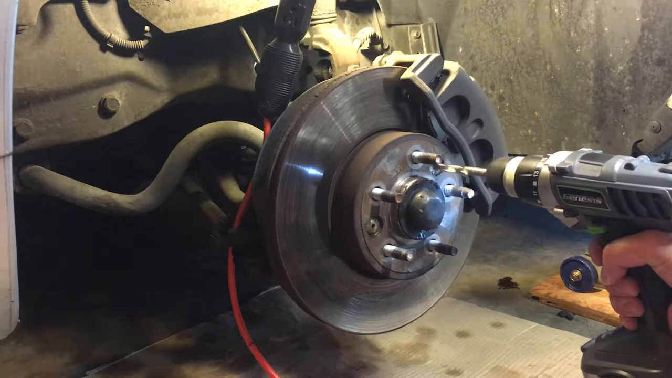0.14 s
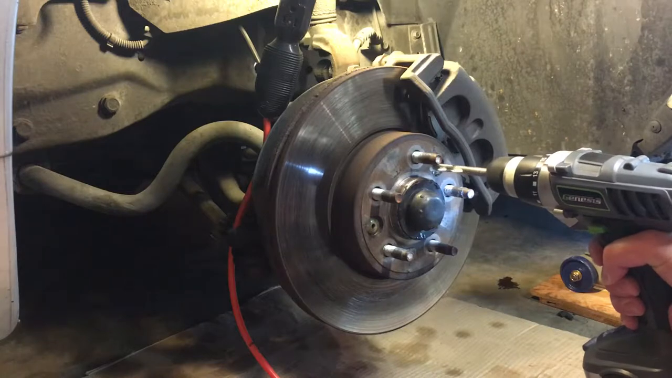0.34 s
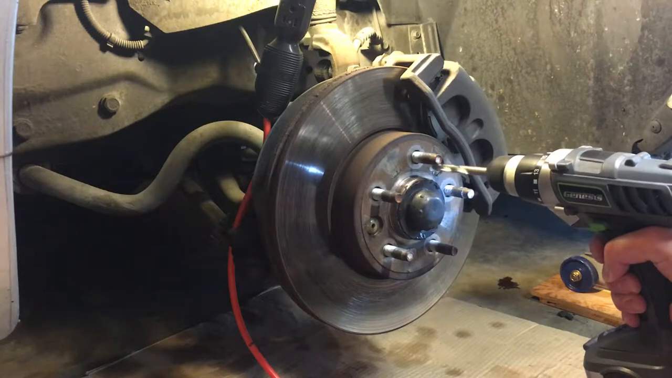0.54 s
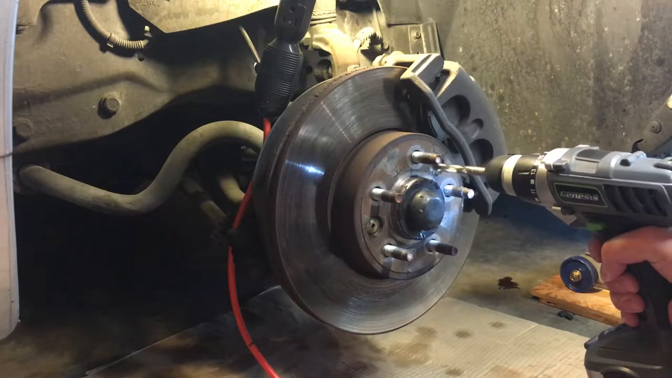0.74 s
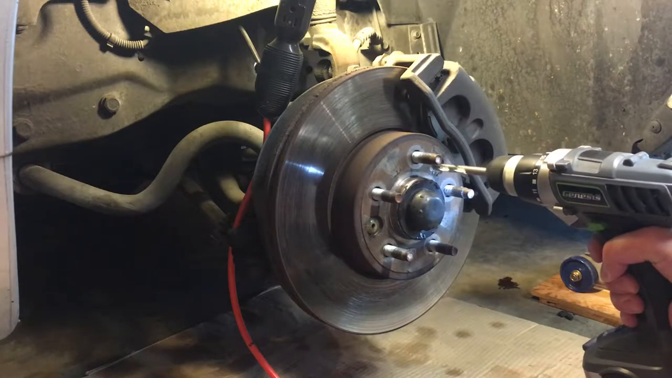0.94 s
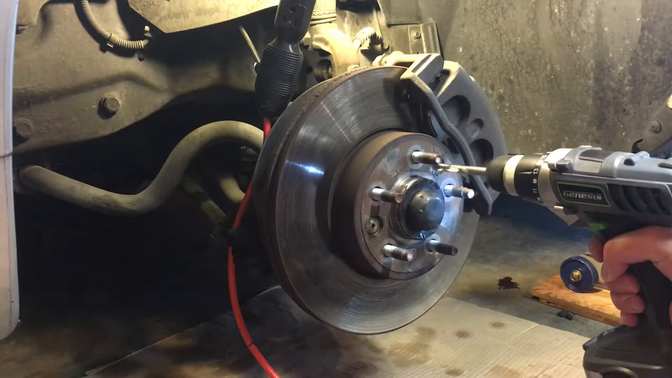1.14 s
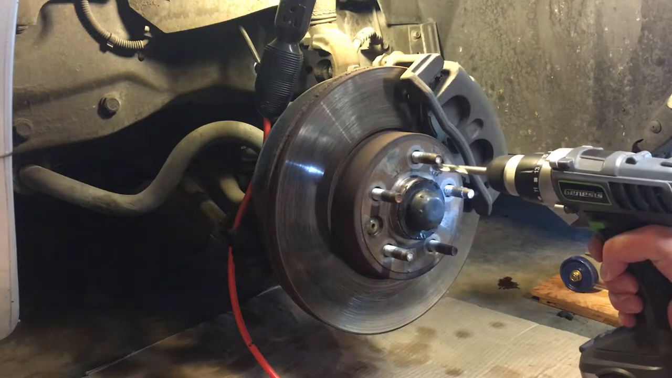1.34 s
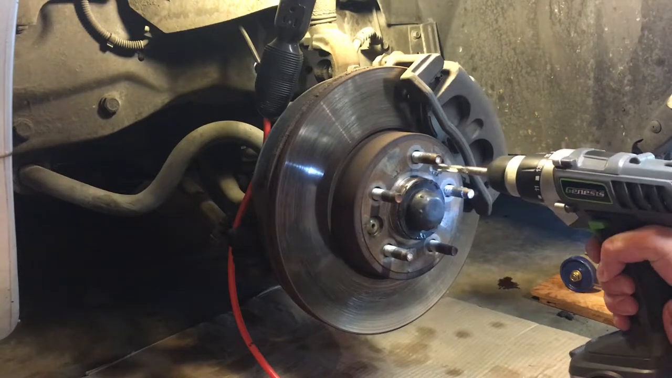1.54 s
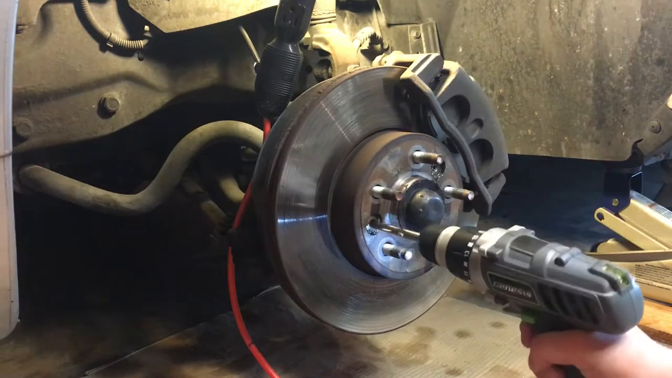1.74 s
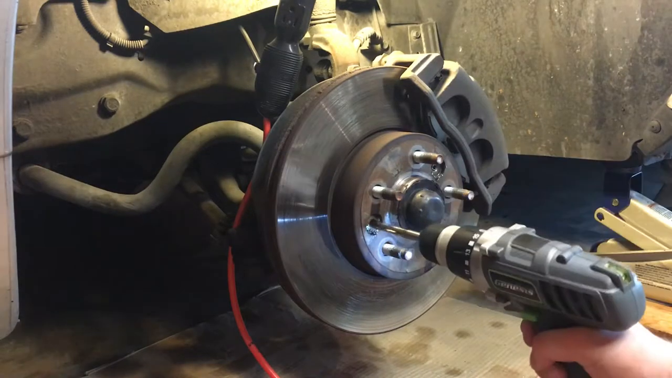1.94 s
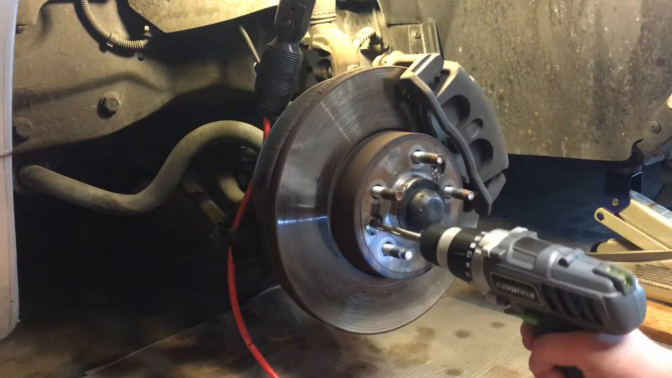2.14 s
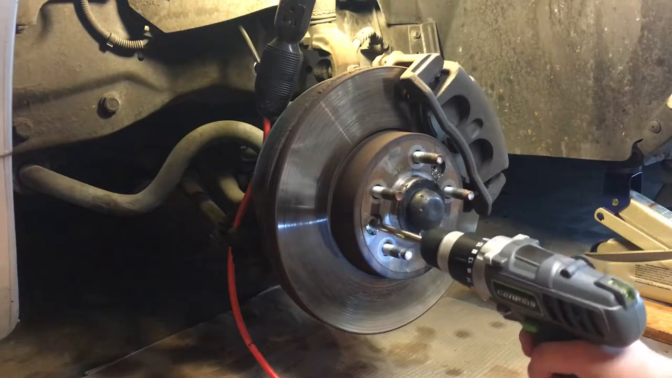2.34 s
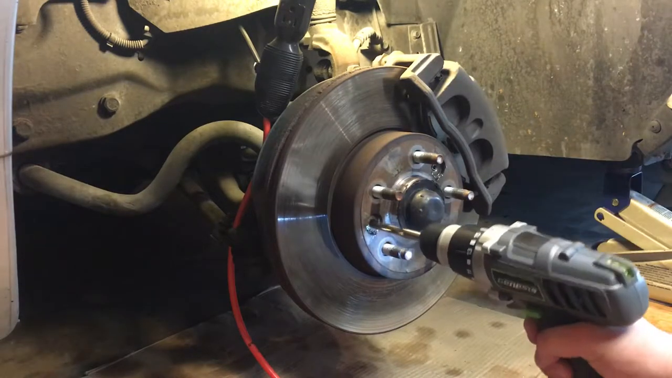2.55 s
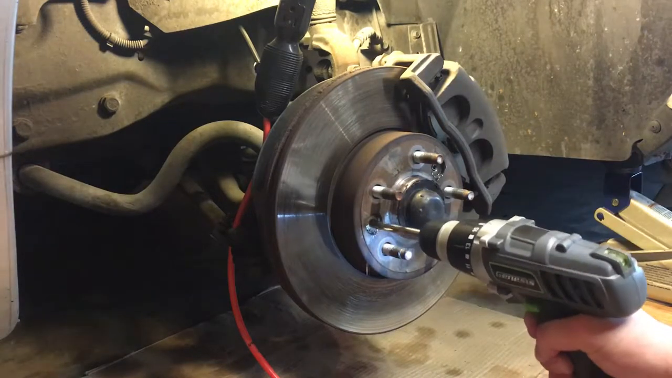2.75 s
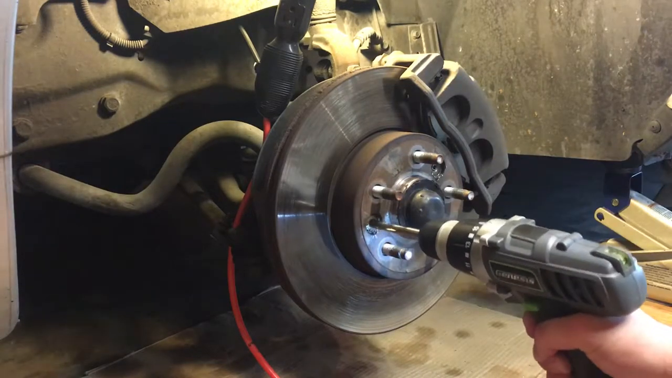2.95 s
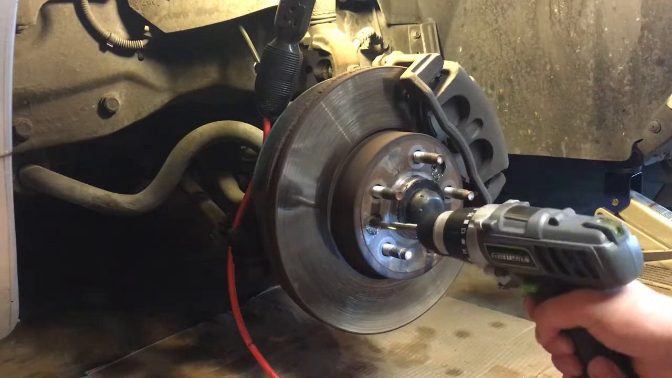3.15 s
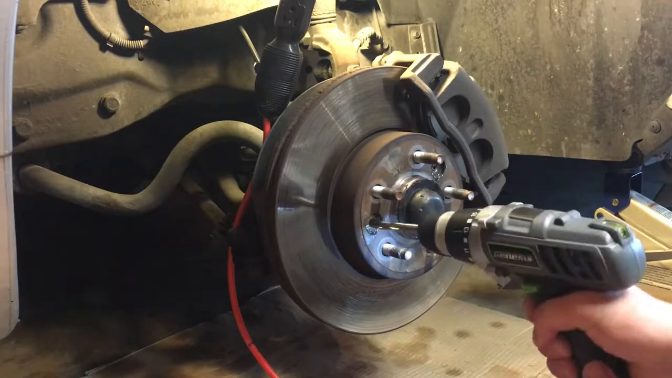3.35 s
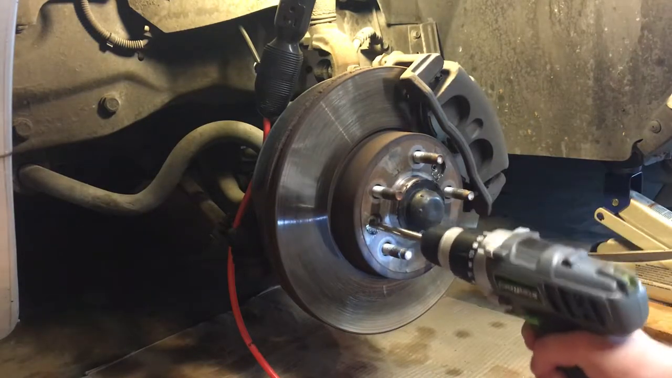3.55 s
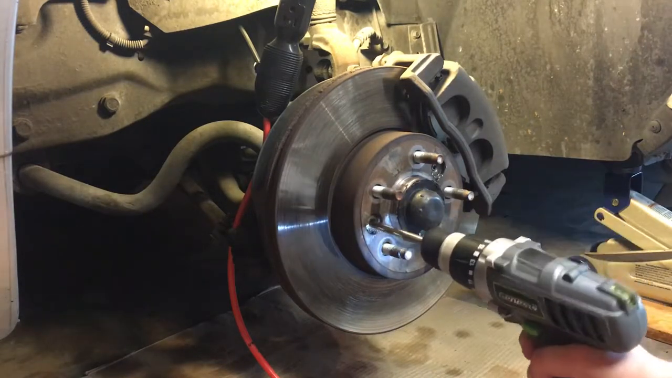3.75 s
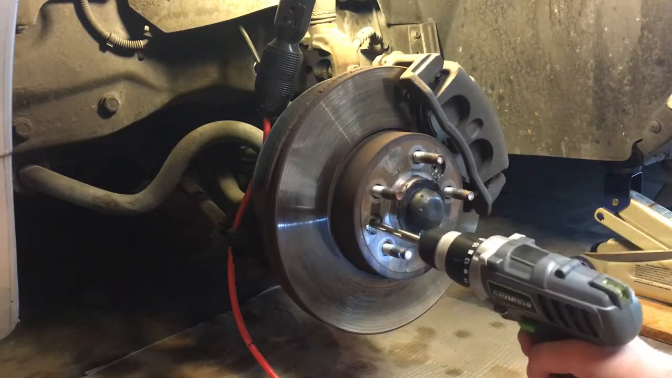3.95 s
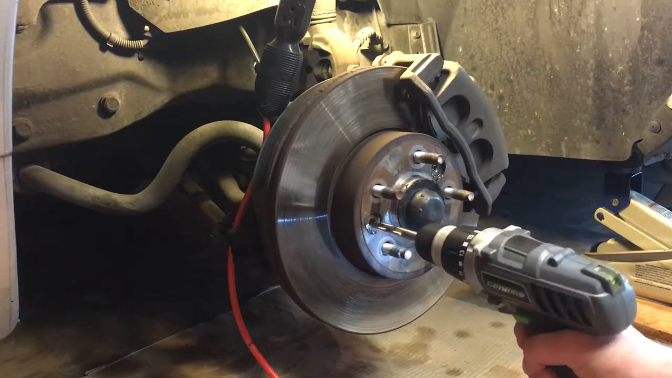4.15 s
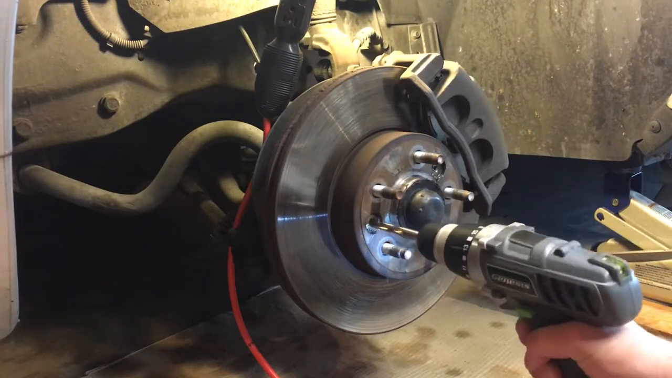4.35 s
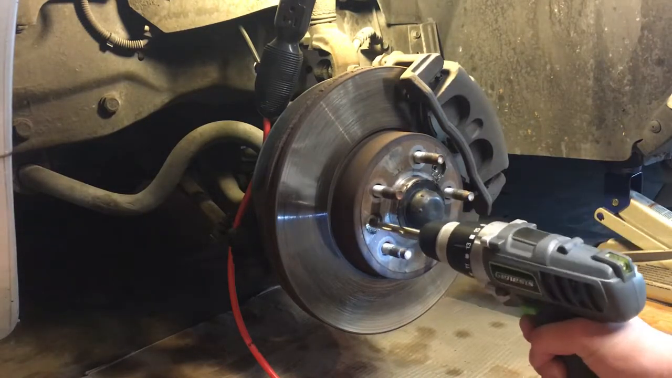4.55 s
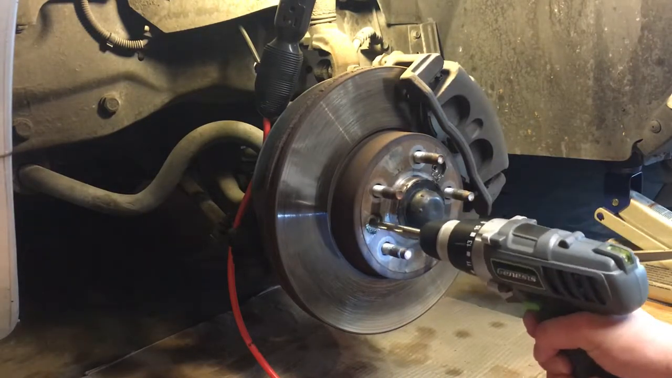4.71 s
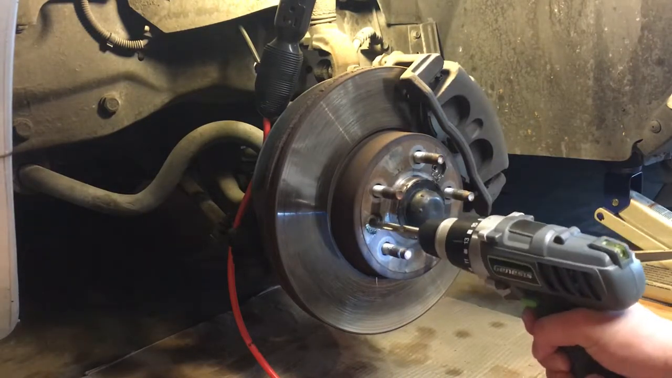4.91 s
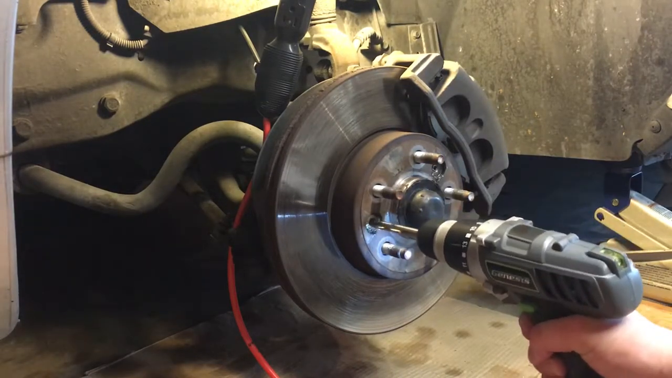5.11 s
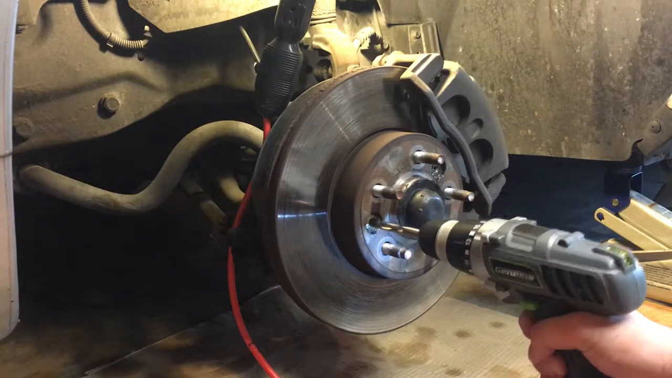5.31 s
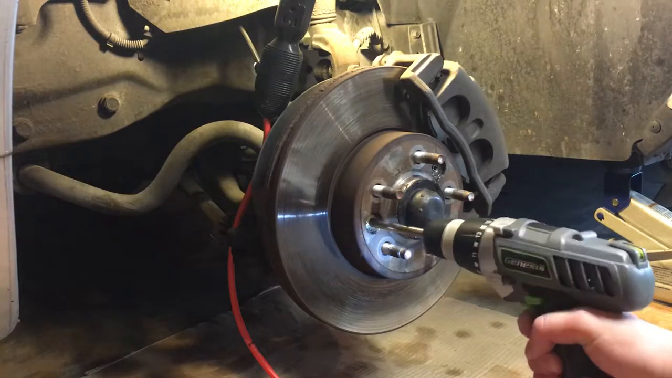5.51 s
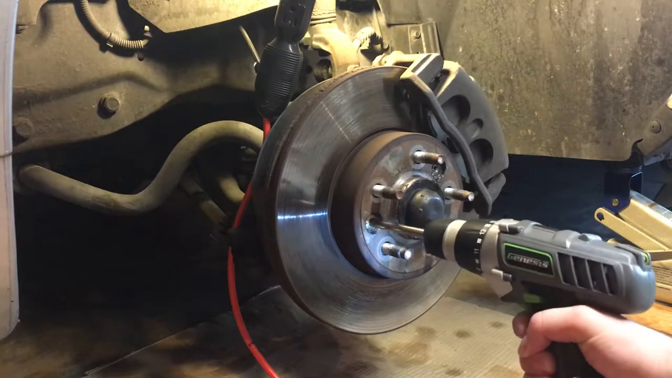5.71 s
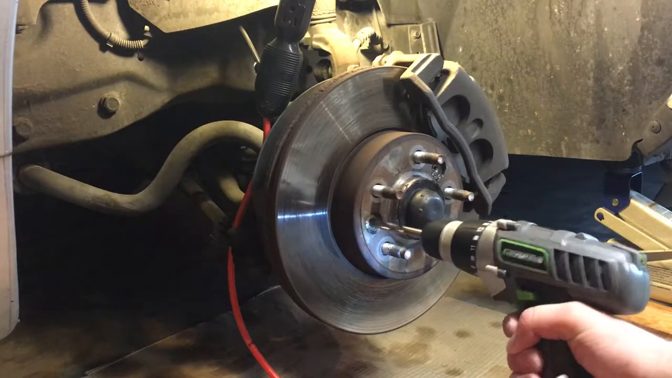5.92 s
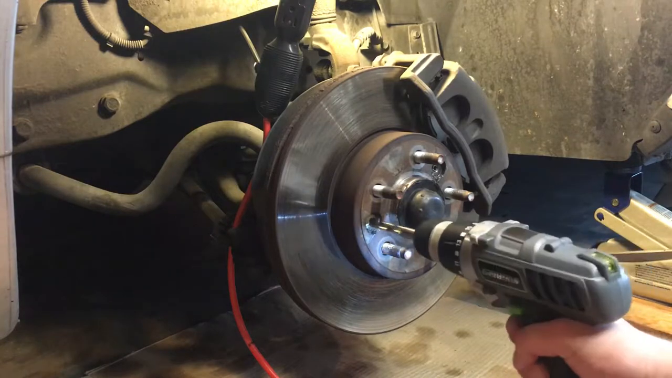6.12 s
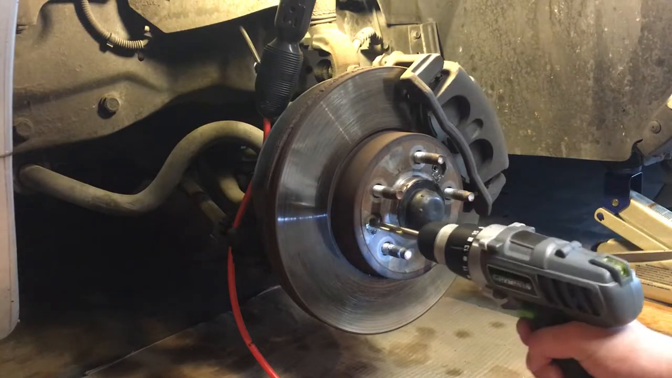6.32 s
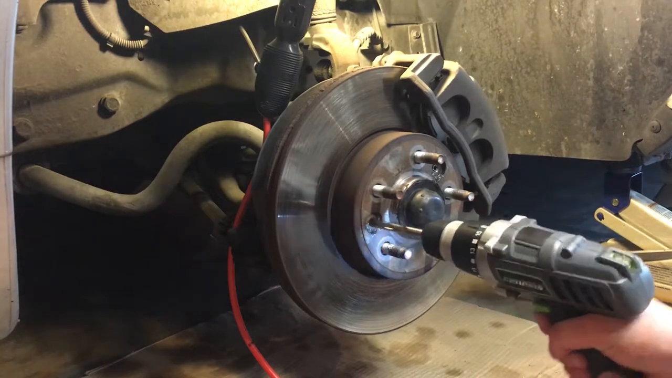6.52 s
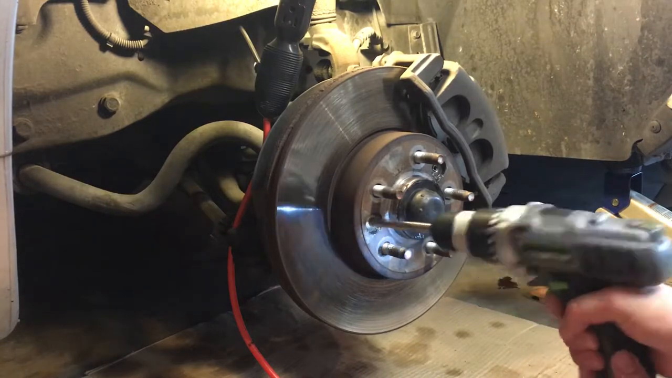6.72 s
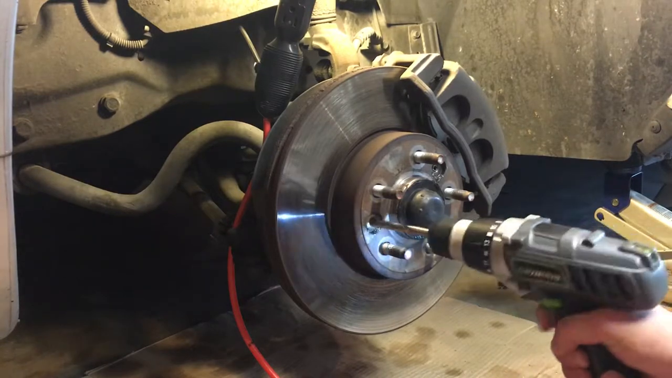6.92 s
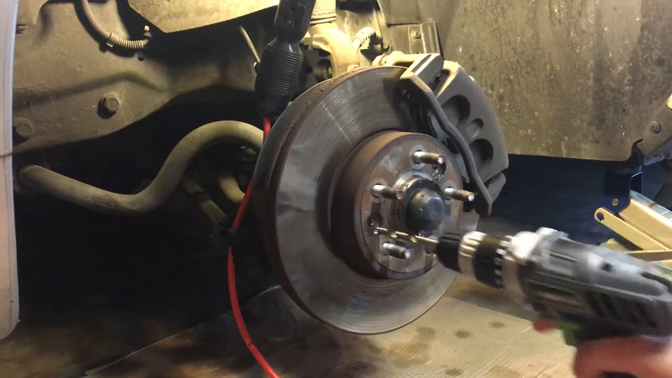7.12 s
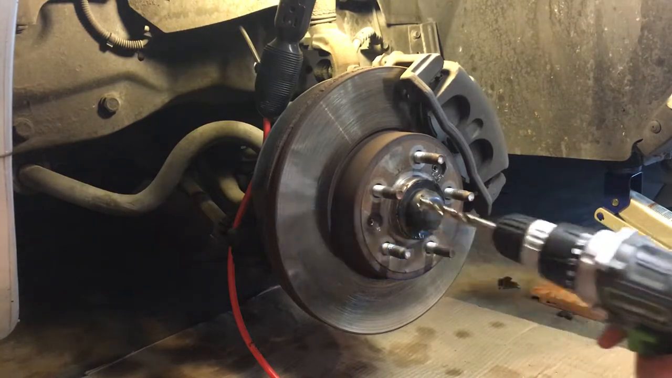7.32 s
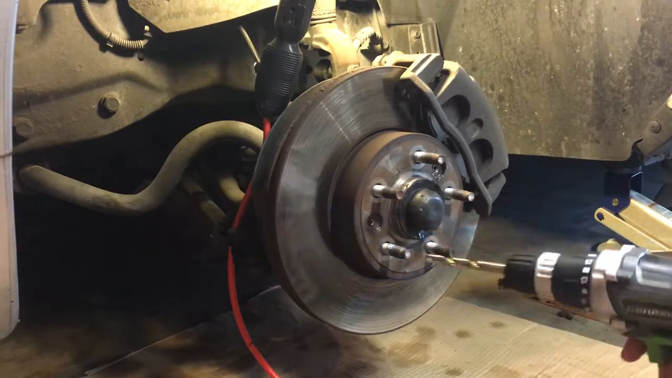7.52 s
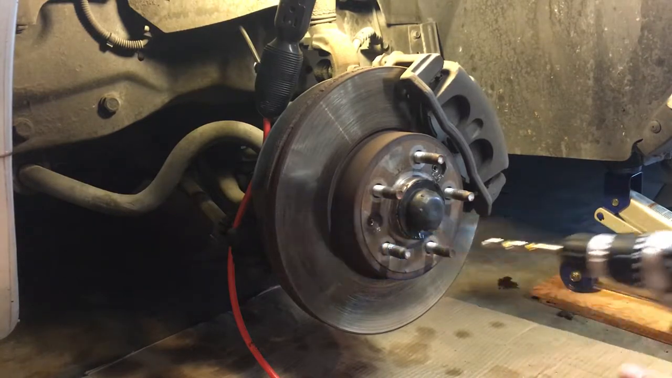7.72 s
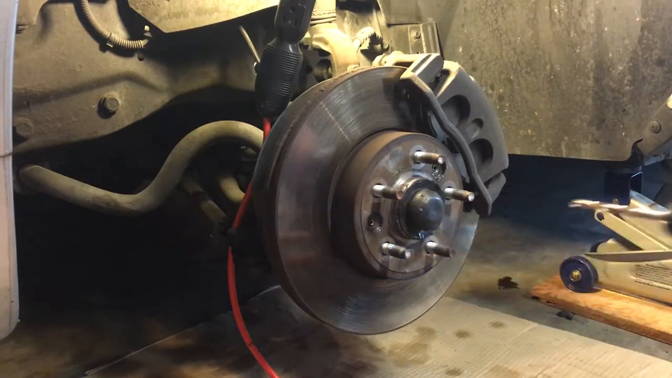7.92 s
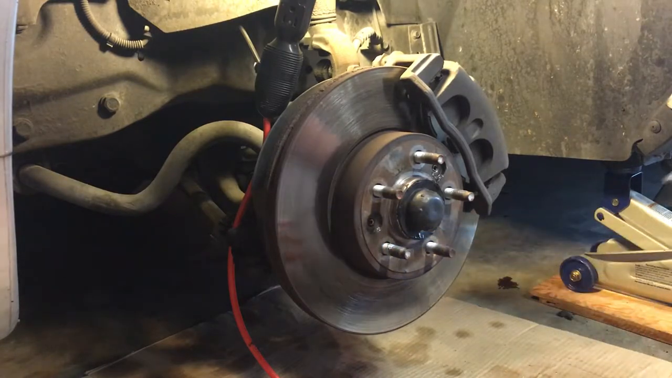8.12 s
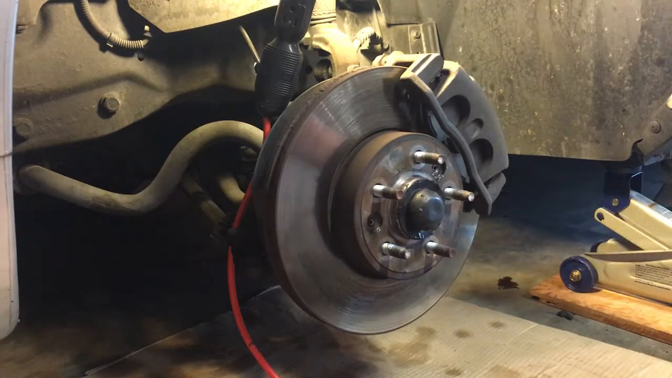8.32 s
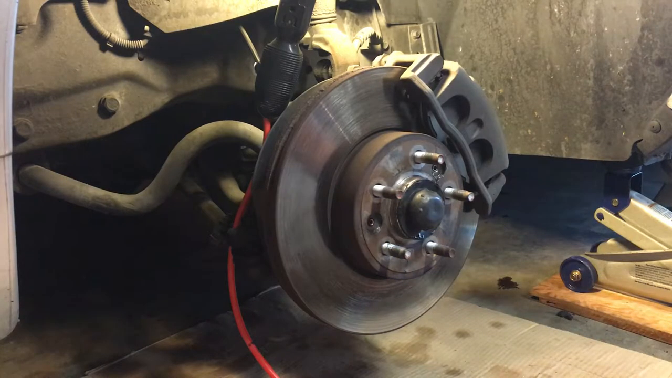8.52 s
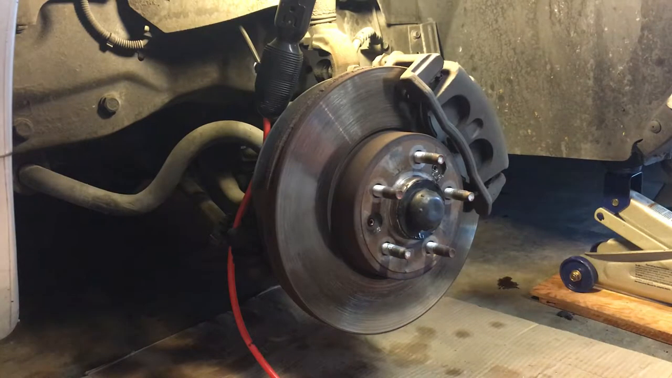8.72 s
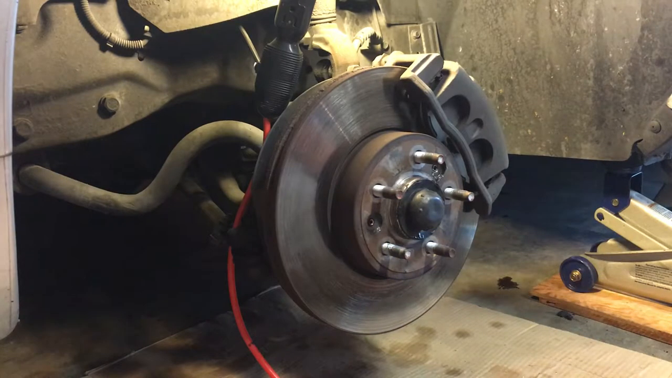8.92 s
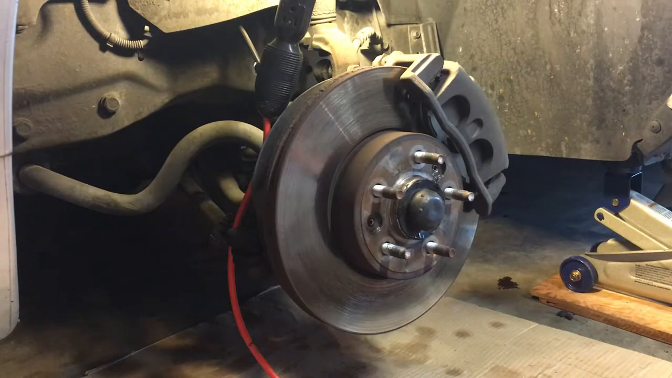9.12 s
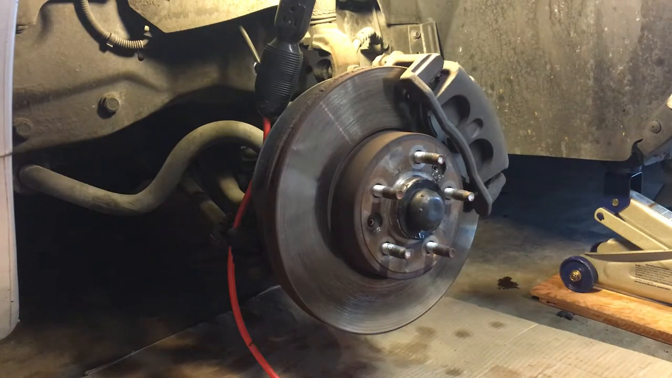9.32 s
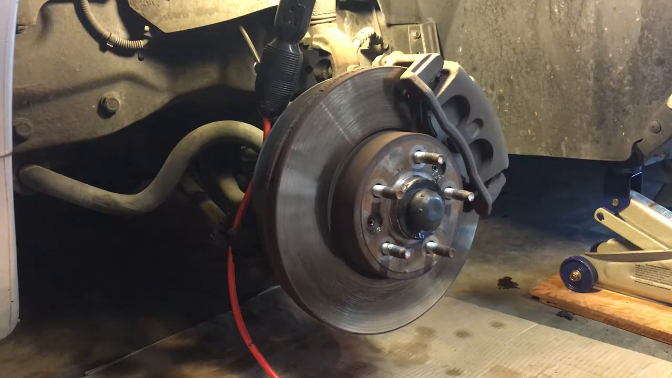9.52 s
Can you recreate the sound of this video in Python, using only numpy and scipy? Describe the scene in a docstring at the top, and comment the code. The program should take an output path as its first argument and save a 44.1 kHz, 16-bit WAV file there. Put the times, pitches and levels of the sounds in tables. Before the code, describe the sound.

A cordless drill whines, grinds and squeals into metal at a brake disc, then stops, followed by a few knocks.

```python
"""A cordless drill bores out two screws in a car's brake disc hub, one after the other, in a small garage.
The motor whines and slows under load, the gears buzz, the bit tears chips from the steel, squeals
and scrapes once per chuck turn. The drill stops, the bit is drawn out with a few ticks and the tool
is put down with ringing knocks. A soft scrape follows over a low hum."""
import sys
import numpy as np
from scipy import signal
from scipy.fft import rfft, irfft
from scipy.io import wavfile

SR = 44100
rng = np.random.default_rng(int(sys.argv[2]) if len(sys.argv) > 2 else 0)


def put_to_file(sound):
    """Save the sound as 16-bit audio at rate SR, in the file named by the first command-line argument."""
    columns = np.atleast_2d(sound).T  # one column per channel
    safe = np.clip(columns, -1, 1)
    whole_steps = np.round(safe * 32767)
    wavfile.write(sys.argv[1], SR, whole_steps.astype(np.int16))


N = 421579
TIME = np.arange(N) / SR

# noise colours: (frequency [Hz], relative level [dB])
AIR_COLOUR = [(15, -38), (28, -24), (45, -4), (70, 0), (120, -3), (160, -12), (300, -16), (500, -25),
              (1050, -24.5), (1600, -30), (2500, -35), (4500, -41), (8500, -42), (15800, -48)]
SLIDE_COLOUR = [(100, -13), (300, 3), (600, -1), (950, -2), (1450, -4), (1700, -15), (4000, -26),
                (12000, -45)]
DULL_COLOUR = [(150, 12.5), (500, 9.5), (1100, 15), (2200, 2.5), (4000, -39), (16000, -47)]
BRIGHT_COLOUR = [(500, 4), (2500, 21.5), (6000, 16), (10000, 9), (16000, 1)]
CRACK_COLOUR = [(100, -11), (220, -12.5), (380, -2.5), (500, 0.5), (760, -2.5), (1100, 2), (1500, -2),
                (2300, -8), (3800, -13), (6000, -14.5), (10000, -21), (16000, -33)]
RUMBLE_COLOUR = [(15, -43.5), (28, -37), (45, -25), (65, -4), (110, 4), (180, -5), (400, -26.5),
                 (2000, -68)]
GEAR_COLOUR = [(25, -38), (100, -14.5), (400, -8.5), (1000, 1.5), (2200, -15), (3500, -6), (6500, 2),
               (9500, -0.5), (12000, -4.5), (14000, -6), (16000, -13)]
SCRAPE_COLOUR = [(300, -49), (1800, 0), (2800, -1.5), (3700, 2), (4500, 0), (5500, -4), (9000, -5),
                 (15000, -14)]
FIRST_CUT_COLOUR = [(25, -57), (80, -24.5), (200, -8.5), (350, -4), (600, -3), (950, 6), (1300, 4),
                    (2000, 3), (2700, -6.5), (4500, -28.5), (15000, -56)]
SECOND_CUT_COLOUR = [(25, -27), (80, -16), (200, -8), (350, -6), (600, -7.5), (950, 3.5), (1300, 1.5),
                     (2100, 3.5), (2700, -4.5), (4500, -16.5), (15000, -31.5)]
# resonances and dips: (frequency [Hz], width [Hz], gain [dB])
SLIDE_MODES = [(340, 50, 8.5), (587, 60, 4.5), (1170, 70, 5), (1420, 50, 4)]
BODY_MODES = [(363, 55, 5.5), (487, 64, -6.5), (778, 91, -17), (932, 260, 3), (995, 32, -11),
              (1100, 18, -2.5), (1320, 60, -4), (1316, 36, -3.5), (1600, 74, -6), (2000, 160, -2),
              (2470, 45, -8), (4300, 220, -0.5), (5140, 730, -2), (7880, 600, -2.5), (10400, 570, -4.5)]  # disc and drill housing
HOUSING_MODES = [(1084, 35, 2.5), (1450, 70, 3), (2050, 190, 7), (2380, 70, 4), (4360, 59, 5)]  # lift motor lines gliding through
# room hum: (frequency [Hz], level [dB])
HUM_LINES = [(59.2, -57), (107.7, -61.5)]
# garage echo: (frequency [Hz], t60 [s])
ECHO_DECAY = [(200, 0.5), (1000, 0.32), (4000, 0.3), (12000, 0.25)]
# tool and hand rubs: (peak time [s], swell [s], dull level [dB], bright level [dB])
HAND_RUBS = [(7.1, .03, -55, -75), (7.6, 0.095, -53, -68), (8.005, 0.07, -78, -64),
             (8.157, 0.034, -55.5, -65), (8.97, 0.25, -56, -65)]
# light contacts of bit and hand: (time [s], level [dB], treble [dB])
TOUCHES = [(7.187, -66, 10), (7.218, -52, 0.5), (7.308, -34, -27), (7.483, -44, -10), (7.545, -27.5, -21.5),
           (7.572, -27, -39), (7.617, -30, -38), (7.689, -36.5, -29), (7.936, -50, -15), (8.123, -46, -14),
           (8.15, -31.5, -17), (8.471, -44.5, -13.5), (8.985, -48, -9)]
# knocks: (time [s], level [dB], part, ring [dB], bass [dB], treble [dB], clatter t60 [s])
BLOWS = [(7.045, -25.5, "spindle", 3.5, -21, 2, .08), (7.053, -28, "spindle", -5, -11, 3, 0.073),
         (7.392, -22, "hub", 0, 8, 1, .085), (8.646, -28, "case", -0.5, 0, -1, 0.18),
         (8.767, -25.5, "case", -2.5, -3, 4, 0.21)]
# modes per struck part: (frequency [Hz], level [dB], t60 [s])
PART_MODES = {"spindle": [(954, -13, 0.13), (1410, -12, .09), (1696, -4, 0.087), (2200, -7, 0.034),
              (3130, -6, .035)], "hub": [(864, 0, 0.073), (980, -6.5, 0.083), (1056, 0, 0.042),
              (3670, 0.5, 0.012)], "case": [(368, -17, .17), (550, -3, 0.075), (1050, -5, .13),
              (1070, -8, .16), (1416, -13, 0.2), (1852, -15, 0.16), (2640, -11, 0.059)]}
# chip snaps, then spindle lock ticks after the stop: (time [s], level [dB], frequency [Hz])
SNAP_EVENTS = [(.235, -29, 4200), (.246, -22, 4000), (.474, -22, 2300), (.476, -29, 3770),
               (.685, -32, 1900), (1.193, -27.5, 1800), (1.277, -30, 2000), (1.524, -29, 6300),
               (7.117, -43, 2950), (7.142, -45, 2950), (7.162, -57, 2950)]
# high modes of bit and disc: (frequency [Hz])
SHIMMER_MODES_HZ = (6100, 6600, 6880, 7550, 8400, 9850)
# rubbed modes: (start [s], length [s], from [Hz], to [Hz], width [Hz], level [dB], chatter [dB])
SQUEAL_EVENTS = [(0, 1.72, 3560, 3560, 220, -45, 0), (0, 1.72, 3930, 3930, 130, -46, 0),
                 (0, 1.72, 4350, 4350, 130, -46, 0), (.22, .08, 4200, 4200, 1200, -37, 0),
                 (0, .9, 6460, 6460, 160, -47, 0), (.45, .55, 1090, 1090, 80, -39, 0),
                 (1.18, .5, 1090, 1090, 80, -39.5, 0), (1.3, .4, 6520, 6520, 200, -46, 0),
                 (1.65, .85, 8920, 8780, 240, -44, 2), (2.03, .7, 1120, 1090, 60, -39, 0),
                 (2.06, 4.7, 1440, 1470, 70, -45, 1), (2.1, 1.5, 4340, 4270, 110, -48, 2),
                 (4.4, .5, 4340, 4350, 110, -45, 2), (5.5, 1.2, 4360, 4320, 110, -46, 2),
                 (2.35, .9, 7530, 7560, 180, -46.5, 2), (3.0, .35, 6570, 6570, 160, -43, 3),
                 (3.09, .14, 2160, 2130, 110, -31.5, 3), (3.22, .4, 2120, 2100, 200, -40, 4),
                 (3.4, .4, 7720, 7600, 180, -47, 3), (3.62, .16, 2120, 2000, 140, -33, 5),
                 (3.62, .75, 7300, 7180, 240, -45.5, 4), (3.6, .7, 3050, 3150, 400, -44, 7),
                 (3.7, .75, 2020, 2070, 500, -36, 7), (4.04, .14, 2010, 2030, 110, -34, 4),
                 (4.38, .6, 1085, 1095, 60, -37, 0), (4.5, 1.0, 4150, 4250, 400, -45, 0),
                 (5.3, .9, 6800, 6640, 200, -44, 2), (5.39, .14, 2140, 2140, 140, -35, 3),
                 (6.05, .42, 2100, 2170, 110, -38.5, 4), (6.6, .16, 1130, 1110, 80, -34, 0),
                 (6.65, .14, 2230, 2230, 200, -35, 5), (6.76, .34, 12800, 12800, 2500, -41.5, 0)]
# motor and gear lines: (multiple of rotor speed, relative level [dB])
MOTOR_LINES = [(.81, -13.5), (1, -16.5), (2, -7), (3, 2.5), (4, -1), (5, -3), (6, -4), (7, -6), (8, -9.5),
               (9, -8), (10, -5.5), (11, -6.5), (12, -3.5)]
# rotor, slower as the hand leans on the drill: (time [s], speed [turns/s])
ROTOR_SPEED = [(0.0, 393), (0.36, 390), (0.51, 369), (0.62, 380), (0.8, 382), (0.9, 394), (1.17, 403),
               (1.62, 384), (1.87, 364), (2.2, 371), (2.39, 371), (2.48, 360), (2.83, 353), (2.91, 360),
               (3.09, 356), (3.22, 346), (3.53, 356), (3.72, 348), (3.92, 350), (4.14, 336), (4.28, 337),
               (4.48, 360), (4.83, 371), (5.1, 397), (5.31, 389), (5.42, 377), (5.5, 357), (5.69, 367),
               (5.82, 361), (6.0, 374), (6.18, 328), (6.3, 352), (6.48, 363), (6.57, 377), (6.73, 365),
               (6.84, 395), (7.04, 401)]
# hub shaking under the bit: (time [s], level [dB])
RUMBLE_LEVEL = [(0.0, -52), (0.6, -69.5), (1.45, -80), (1.7, -52), (2.6, -54), (2.9, -46), (3.3, -64.5),
                (4.2, -68), (4.8, -66), (7.0, -59.5)]
# cut, deepening on screw one, skating then biting on screw two: (time [s], level [dB])
CUT_LEVEL = [(0.0, -31), (1.1, -32.5), (1.63, -28.5), (1.69, -34.5), (2.03, -35.5), (2.08, -31),
             (2.3, -32.5), (6.63, -32.5), (6.71, -31), (6.78, -33.5), (7.04, -36.5)]

SECOND_SCREW_S, BRAKE_S, STOP_S = 1.68, 7.05, 7.058
BIT_OFFSET_TURNS, SCRAPE_DB, WHINE_DB = (-.09, .22), (-33.8, -36.5), (-37.5, -35)  # per screw


def from_db(db):
    """Decibels to gain."""
    return np.exp(np.asarray(db) * (np.log(10) / 20))


def rms_one(x):
    """Scale to rms 1."""
    return x / np.sqrt(np.mean(x ** 2) + 1e-20)


def in_time(curve):
    """Curve value at every sample."""
    return np.interp(TIME, *np.transpose(curve))


def at_hz(points, hz):
    """Interpolate over log frequency."""
    f, value = np.transpose(points)
    return np.interp(np.log(hz + 0.0012), np.log(f), value)


def bumps_db(resonances, hz):
    """Summed gain of peaks and dips."""
    return sum(db / (1 + (2 * (hz - f) / width) ** 2) for f, width, db in resonances)


def drift(hz, step=20):
    """Slow random wander, rms about 1."""
    pole = np.exp(-2 * np.pi * hz * step / SR)
    noise = rng.standard_normal((N + SR) // step + 2)
    slow = signal.lfilter([1], [1, -2 * pole, pole * pole], noise)[SR // step:]
    return np.interp(np.arange(N) / step, np.arange(len(slow)), rms_one(slow))


def band_noise(hz, width_hz):
    """One noise band, rms 1."""
    band = signal.butter(2, [max(hz - width_hz / 2, 5), hz + width_hz / 2], "band", fs=SR, output="sos")
    return rms_one(signal.sosfilt(band, rng.standard_normal(N + SR))[SR:])


def coloured(x, colour, resonances=(), size=8192):
    """Minimum-phase filter of unit energy: broad colour plus resonances."""
    hz = np.arange(size // 2 + 1) * SR / size
    level_db = at_hz(colour, hz) + bumps_db(resonances, hz)
    cepstrum = irfft(np.log(from_db(level_db)))[:size // 2]
    cepstrum[0] = 0
    response = irfft(np.exp(rfft(2 * cepstrum, size)))
    return signal.oaconvolve(x, response / np.linalg.norm(response))[:N]


def grains(per_s, spread_db):
    """Tiny fractures of random time and size, rms 1."""
    born = rng.random(N) < per_s / SR
    impulses = born * rng.standard_normal(N)
    return rms_one(impulses * from_db(spread_db * np.minimum(rng.exponential(1, N), 4)))


def decay(start_s, t60_s):
    """Jump to 1, then exponential fall."""
    at, out = round(start_s * SR), np.zeros(N)
    age_s = TIME[:min(SR // 2, N - at)]
    out[at:at + len(age_s)] = from_db(-60 * age_s / t60_s)
    return out


def background(air_db=-56.5, waver_db=2.5):
    """Room rumble and wavering hum."""
    hum = 0
    for hz, db in HUM_LINES:
        amplitude = np.sqrt(2) * from_db(db + waver_db * drift(4.6))
        hum += amplitude * np.sin(2 * np.pi * hz * TIME + drift(6.1))
    return hum + from_db(air_db) * coloured(rng.standard_normal(N), AIR_COLOUR)


def garage(x, build_s=0.0027, size=32768):
    """Diffuse echo; treble dies first."""
    age_s, hz = np.arange(size) / SR, np.arange(size // 2 + 1) * SR / size
    noise = rfft(rng.standard_normal(size))
    octave = np.round(np.log2(np.maximum(hz, 128)))
    tail = sum(irfft(noise * (octave == k)) * from_db(-60 * age_s / at_hz(ECHO_DECAY, 2 ** k))
               for k in np.unique(octave))
    tail *= np.clip(age_s / build_s, 0, 1) ** 2
    return signal.oaconvolve(x, tail / np.linalg.norm(tail))[:N]


def slide(start_s=9.215, end_s=9.55, fade_s=.025, start_db=-62, rise_db_per_s=20):
    """Something slides softly over the floor: dense slips under growing pressure."""
    age_s = np.clip(TIME, start_s, end_s) - start_s
    gate = np.clip(np.minimum(age_s, end_s - TIME) / fade_s, 0, 1)
    slips = grains(per_s=2500, spread_db=-2.0) * gate * from_db(start_db + rise_db_per_s * age_s)
    return coloured(slips, SLIDE_COLOUR, SLIDE_MODES)


def rustle(rise_db=15, fall_db_per_s=163):
    """Tool and hand rub: tiny slips that swell and fade."""
    dull, bright = 0, 0
    for peak_s, swell_s, dull_db, bright_db in HAND_RUBS:
        shape_db = np.minimum(rise_db * (TIME - peak_s) / swell_s, -fall_db_per_s * (TIME - peak_s))
        shape = from_db(np.maximum(shape_db, -120))
        dull += from_db(dull_db) * shape
        bright += from_db(bright_db) * shape
    slips = grains(per_s=2900, spread_db=1.5)
    return coloured(slips * dull, DULL_COLOUR) + coloured(slips * bright, BRIGHT_COLOUR)


def ticks(tap_t60_s=0.098, click_t60_s=0.049, tap_db=-15.5, click_db=3.0):
    """Light touches: dull tap plus shorter bright click."""
    tap = sum(from_db(db + tap_db) * decay(s, tap_t60_s) for s, db, _ in TOUCHES)
    click = sum(from_db(db + treble_db + click_db) * decay(s, click_t60_s) for s, db, treble_db in TOUCHES)
    dull = coloured(tap * rng.standard_normal(N), DULL_COLOUR)
    return dull + coloured(click * rng.standard_normal(N), BRIGHT_COLOUR)


def ring(start_s, modes):
    """Modes struck together, each with its own decay."""
    return sum(from_db(db) * decay(start_s, t60_s) * np.sin(2 * np.pi * (hz * TIME + rng.random()))
               for hz, db, t60_s in modes)


def knocks(rise_s=0.0017, crack_t60_s=0.02, clatter_db=-9.5, rebound_s=0.022, rebound_db=-18):
    """Spindle stops, bit meets hub, tool is set down: crack, clatter, rebound and ring."""
    out = np.zeros(N)
    for s, db, part, ring_db, bass_db, treble_db, clatter_t60_s in BLOWS:
        force = from_db(db) * np.clip((TIME - s) / rise_s, 0, 1)
        clatter = from_db(clatter_db) * decay(s, clatter_t60_s)
        rebound = from_db(rebound_db) * decay(s + rebound_s, crack_t60_s)
        contacts = (decay(s, crack_t60_s) + clatter + rebound) * rng.standard_normal(N)
        out += coloured(force * contacts, CRACK_COLOUR, [(250, 750, bass_db), (11000, 14000, treble_db)])
        out += force * from_db(ring_db) * ring(s, PART_MODES[part])
    return out


def snaps(q=2.3, t60_s=0.021):
    """Chip snaps and spindle lock ticks ring the steel briefly."""
    return sum(from_db(db) * decay(s, t60_s) * band_noise(hz, hz / q) for s, db, hz in SNAP_EVENTS)


def shimmer(level_db=-47, swing_db=6, q=50):
    """High steel modes come and go independently as the contact shifts."""
    modes = sum(band_noise(hz, hz / q) * from_db(swing_db * np.minimum(drift(3), 1.5))
                for hz in SHIMMER_MODES_HZ)
    return from_db(level_db) * rms_one(modes)


def squeals(chuck_rad, tremble_db=3.0, throb_db=0.5, fade_s=.06, lobes=3):
    """Friction sustains gliding modes; they pulse as the bit catches in its lobed hole."""
    out = np.zeros(N)
    grip_db = tremble_db * drift(30) + throb_db * np.cos(chuck_rad)
    for start_s, length_s, from_hz, to_hz, width_hz, db, chatter_db in SQUEAL_EVENTS:
        on = (TIME >= start_s) & (TIME < start_s + length_s)
        age_s = TIME[on] - start_s
        gate = np.clip(np.minimum(age_s, length_s - age_s) / fade_s, 0, 1)
        phase_rad = 2 * np.pi * np.cumsum(from_hz + (to_hz - from_hz) * age_s / length_s) / SR
        lowpass = signal.butter(2, width_hz / 2, fs=SR, output="sos")
        in_phase, quadrature = signal.sosfilt(lowpass, rng.standard_normal((2, len(age_s))))
        mode = in_phase * np.cos(phase_rad) + quadrature * np.sin(phase_rad)
        grip = from_db(grip_db[on] + chatter_db * np.cos(lobes * chuck_rad[on]))
        out[on] += from_db(db) * gate * rms_one(grip * mode)
    return out


def scrape(chuck_rad, level_db, throb_db=3.0):
    """The bit runs out of true and rubs its hole once per turn."""
    rub = rms_one(grains(per_s=13000, spread_db=2.0) * from_db(throb_db * np.cos(chuck_rad)))
    return coloured(rub * from_db(level_db), SCRAPE_COLOUR, BODY_MODES)


def gears(rotor_turns, level_db=-34, buzz_db=2.0):
    """Brushes and gear teeth hiss in step with the rotor."""
    teeth = rms_one(rng.standard_normal(N) * from_db(buzz_db * np.cos(2 * np.pi * rotor_turns)))
    return coloured(teeth * from_db(level_db), GEAR_COLOUR, BODY_MODES)


def motor(speed_hz, rotor_turns, wobble_rad=.16, stagger_rad=0.51, slip_rad=0.74,
          flutter_db=3.8, flutter_hz=30):
    """Whine, rms 1: the rotor staggers under load; gear play makes each line flutter and slip."""
    rotor_rad = 2 * np.pi * rotor_turns + wobble_rad * drift(15.5) + stagger_rad * drift(2.93)
    out = 0
    for multiple, db in MOTOR_LINES:
        lift_db = np.repeat(bumps_db(HOUSING_MODES, multiple * speed_hz[::20]), 20)[:N]
        amplitude = from_db(db + lift_db + flutter_db * drift(flutter_hz))
        phase_rad = multiple * rotor_rad + slip_rad * drift(flutter_hz) + 2 * np.pi * rng.random()
        out += amplitude * np.sin(phase_rad)
    return rms_one(out)


def cutting(bite, cut_db, first_screw):
    """Chips break off in uneven lumps; the hub shakes with each bite."""
    chips = grains(per_s=9000, spread_db=1.7) * bite * from_db(cut_db)
    first_cut = coloured(chips * first_screw, FIRST_CUT_COLOUR, BODY_MODES)
    second_cut = coloured(chips * ~first_screw, SECOND_CUT_COLOUR, BODY_MODES)
    shake = rng.standard_normal(N) * bite * from_db(in_time(RUMBLE_LEVEL))
    return first_cut + second_cut + coloured(shake, RUMBLE_COLOUR)


def drill(bite_db=1.0, lip_db=0.64, load_db_per_db=0.52, brake_tau_s=.07):
    """The rotor drives gears and bit; once braked, its sinking whine outlasts the cut."""
    speed_hz = in_time(ROTOR_SPEED) * np.exp(-np.clip(TIME - BRAKE_S, 0, 1) / brake_tau_s)
    rotor_turns = np.cumsum(speed_hz) / SR
    first_screw = TIME < SECOND_SCREW_S
    chuck_turns = rotor_turns / 44.98  # gear ratio
    chuck_rad = 2 * np.pi * (chuck_turns + np.where(first_screw, *BIT_OFFSET_TURNS))
    lips = np.cos(chuck_rad) - np.cos(2 * chuck_rad)  # two lips bite in turn
    bite = rms_one(from_db(bite_db * band_noise(hz=29.4, width_hz=49.0) + lip_db * lips))
    cut_db = in_time(CUT_LEVEL)
    boring = cutting(bite, cut_db, first_screw)
    boring += scrape(chuck_rad, np.where(first_screw, *SCRAPE_DB)) + gears(rotor_turns)
    load_db = load_db_per_db * (cut_db - np.median(cut_db))  # harder cut, louder whine
    whine = from_db(np.where(first_screw, *WHINE_DB) + load_db) * bite * motor(speed_hz, rotor_turns)
    boring += squeals(chuck_rad) + shimmer()
    boring_gate = np.where(TIME < STOP_S, 1, decay(STOP_S, t60_s=0.016))
    whine_gate = np.where(TIME < STOP_S, 1, decay(STOP_S, t60_s=0.16))
    return boring_gate * boring + whine_gate * whine


def scene(tool_echo_db=-12.0, handling_echo_db=-7.5):
    """Drill and handling in the garage, dual mono."""
    tool = drill() + snaps()
    handling = knocks() + ticks() + rustle() + slide()
    echo = garage(from_db(tool_echo_db) * tool + from_db(handling_echo_db) * handling)
    mono = tool + handling + echo + background()
    return np.stack([mono, mono])


def record(dry, cutoff_hz=15900):
    """Steep low-pass."""
    return signal.sosfilt(signal.ellip(12, .1, 80, cutoff_hz, fs=SR, output="sos"), dry)


dry = scene()
out = record(dry)
put_to_file(out)
```